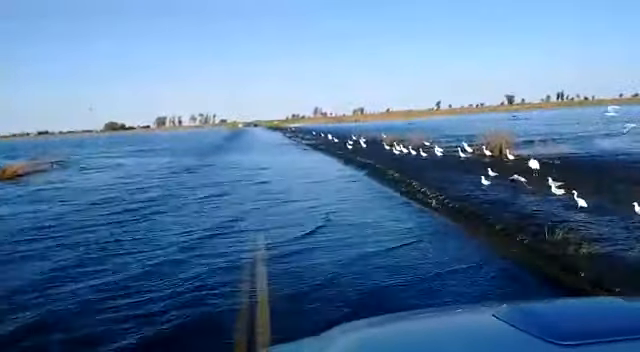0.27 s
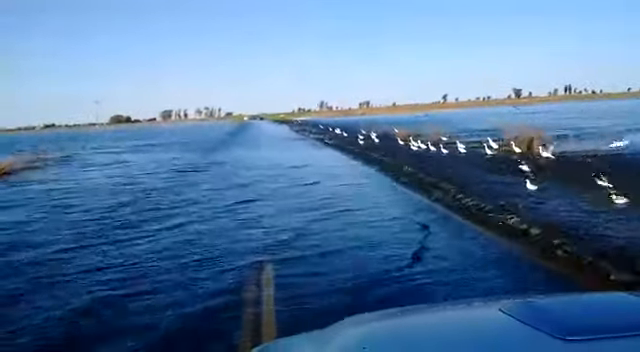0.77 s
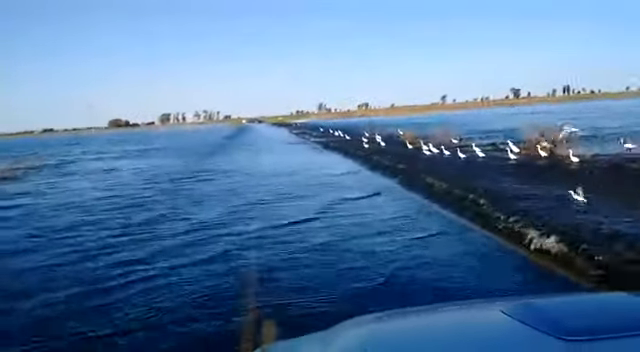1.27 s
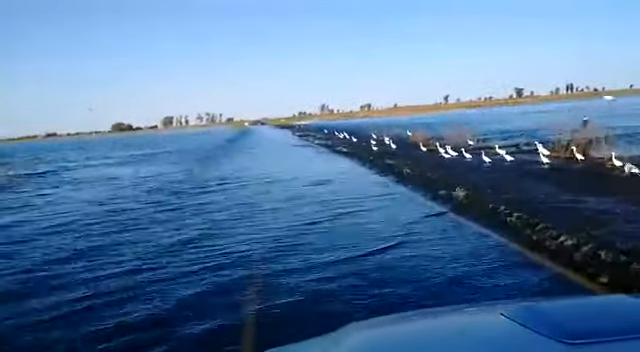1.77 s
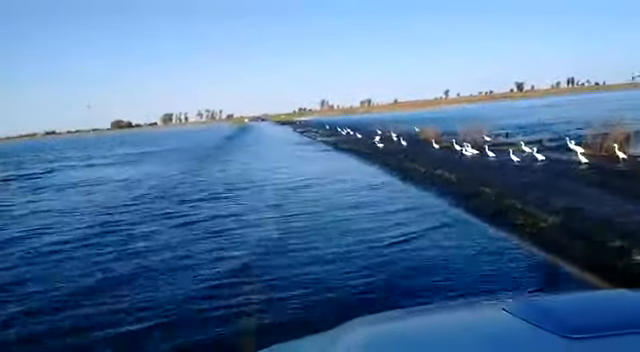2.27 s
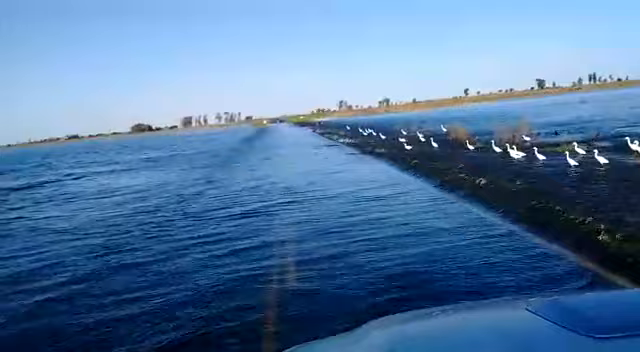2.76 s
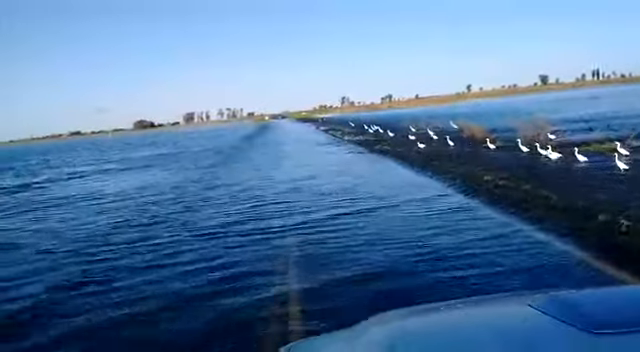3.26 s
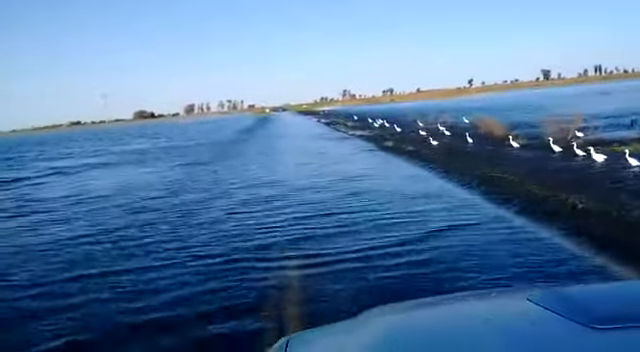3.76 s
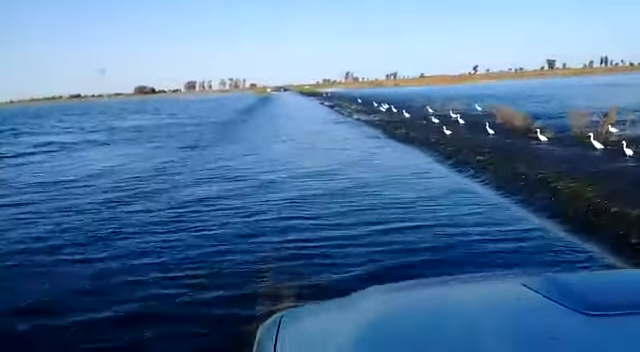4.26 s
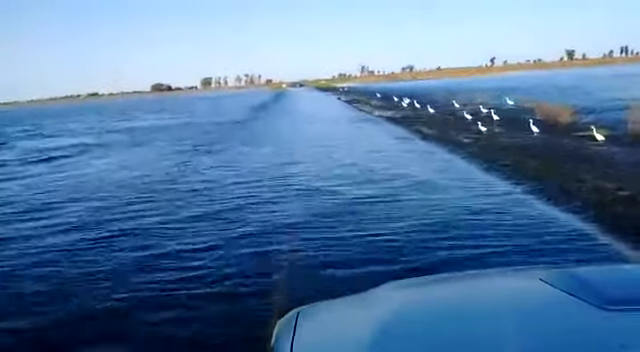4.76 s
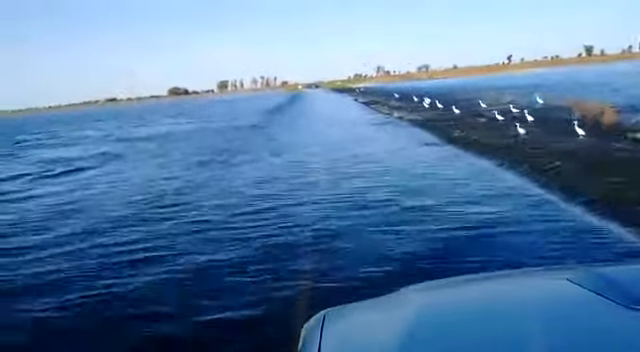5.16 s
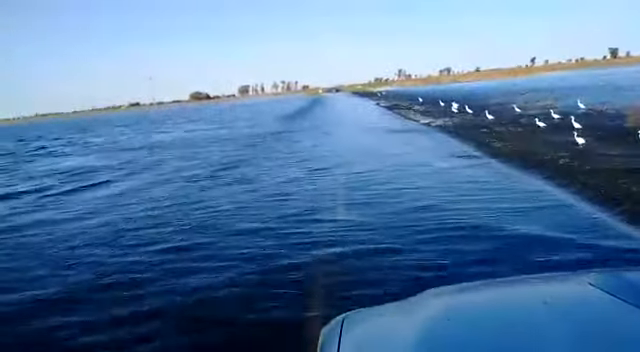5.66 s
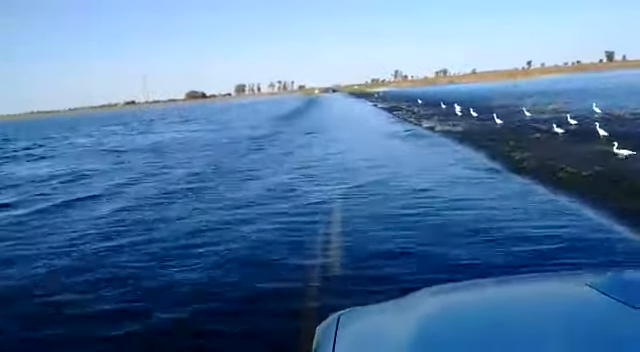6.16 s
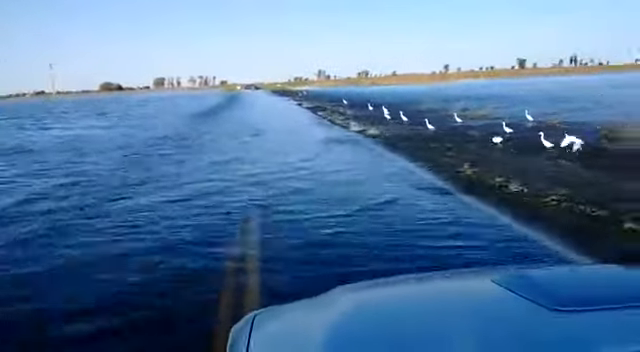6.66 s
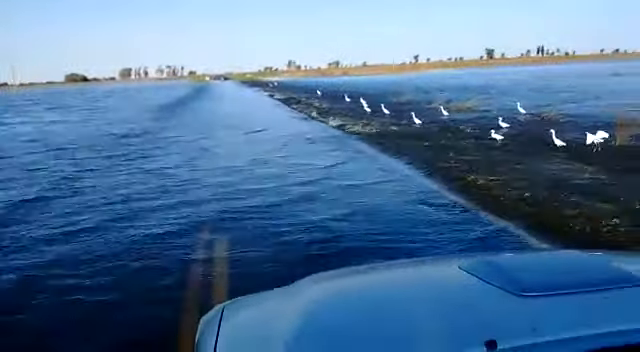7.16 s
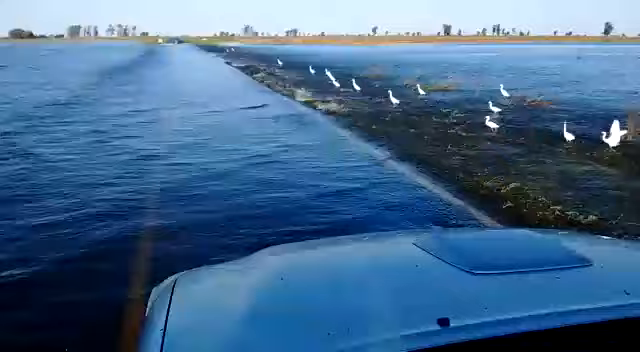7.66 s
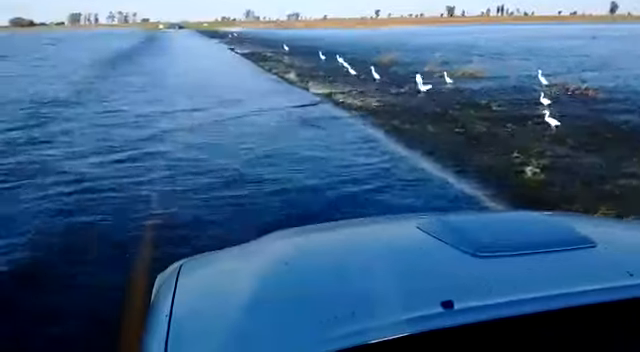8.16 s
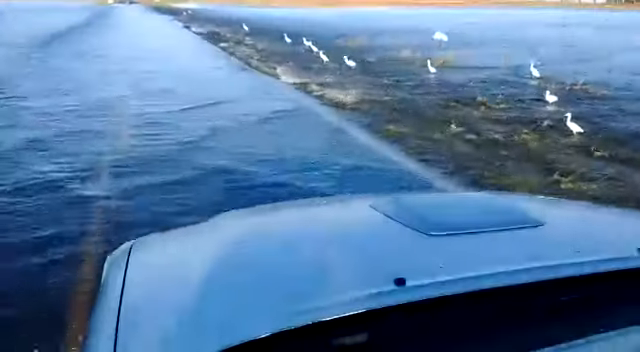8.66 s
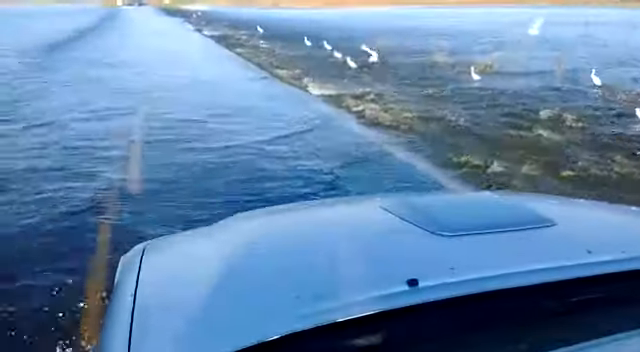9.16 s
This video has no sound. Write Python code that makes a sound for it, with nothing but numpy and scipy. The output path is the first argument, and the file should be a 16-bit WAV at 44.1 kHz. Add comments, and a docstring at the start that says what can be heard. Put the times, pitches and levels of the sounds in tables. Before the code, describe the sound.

Steady tyre wash on a flooded open road: patchy wet hiss, ringing droplets and gurgling bubbles, surging gently. Over it, wind roars low and a breathy, unsteady hum sags and barks as air crosses the unprotected handheld microphone. Sudden buffets thud and distort near three, four and five seconds, with another near eight and a half. The splash dips in the middle, then swells again. No echo, dull extreme treble.

```python
"""A flooded road, heard from a phone held out of the side window of a rolling vehicle.
The tyres throw an unbroken wash and spray: patchy hiss mixed with ringing drops, and big bubbles gurgle.
The airstream rumbles as shaped noise and blows a hollow, wavering hum, a noisy narrow resonance.
Buffets and hard slaps of wind set the microphone ports ringing in short bursts.
Loud bursts make the gain control duck and creep back; the highest peaks clip."""
import sys
import numpy as np
from scipy import signal
from scipy.fft import rfft, irfft, next_fast_len
from scipy.io import wavfile

SR = 44100
rng = np.random.default_rng(int(sys.argv[2]) if len(sys.argv) > 2 else 0)


def bounce(signal):
    """Save signal as a 16-bit WAV file at the path given by the first command-line argument."""
    frames = np.transpose(np.atleast_2d(signal))
    limited = np.clip(frames, -1, 1)
    pcm = np.round(limited * 32767).astype(np.int16)
    wavfile.write(sys.argv[1], SR, pcm)


N = 415863
TIME = np.arange(N) / SR


def from_db(db):
    """Decibels to gain."""
    return 10 ** (np.asarray(db) / 20)


def rms_one(x):
    """Scale to an rms of 1."""
    return x / np.sqrt(np.mean(x ** 2) + 1e-20)


def in_time(rows):
    """Draw each column of a timed curve at every sample."""
    s, *columns = np.transpose(rows)
    return [np.interp(TIME, s, c) for c in columns]


def at_hz(points, hz):
    """Read a table on a log-frequency axis."""
    f, value = np.transpose(points)
    return np.interp(np.log(hz), np.log(f), value)


def filtered(x, response):
    """Pass x through a smooth response, given as a function of Hz."""
    size = next_fast_len(N, real=True)
    hz = np.maximum(np.arange(size // 2 + 1) * SR / size, 1)
    return irfft(rfft(x, size) * response(hz), size)[..., :N]


def coloured(x, spectrum):
    """Give white sound a spectrum; rms 1."""
    return rms_one(filtered(x, lambda hz: from_db(at_hz(spectrum, hz))))


def drift(rate):
    """Slow random wander with an rms of 1; a higher rate moves faster."""
    # made at a twentieth of the sample rate, after a run-in
    r = np.exp(-40 * np.pi * rate / SR)
    noise = rng.standard_normal(N // 20 + 4002)
    slow = signal.lfilter([1], [1, -2 * r, r * r], noise)[4000:]
    return np.interp(np.arange(N) / 20, np.arange(len(slow)), rms_one(slow))


def soften_above(x, hz):
    """Roll off the treble gently."""
    return signal.sosfilt(signal.butter(2, hz, fs=SR, output="sos"), x)


def drops(per_s, spread_db, cycles, low_hz, high_hz, count):
    """Unequal random clicks ring a bank of pitches, falling 60 dB in the given cycles; rms 1."""
    out = np.zeros(N)
    for hz in np.geomspace(low_hz, min(high_hz, .4 * SR), count):
        at = rng.integers(0, N, int(per_s * N / SR / count))
        size_db = spread_db * np.minimum(rng.exponential(1, len(at)), 5)
        clicks = np.full(N, 1e-18)
        clicks[at] = from_db(size_db) * rng.choice([-1, 1], len(at))
        r, w = from_db(-60 * hz / (cycles * SR)), 2 * np.pi * hz / SR
        ringing = signal.lfilter([1, 0, -1], [1, -2 * r * np.cos(w), r * r], clicks)
        # wider bands at higher pitch: keep the spectrum even
        out += np.sqrt(hz) * rms_one(ringing)
    return rms_one(out)


def sheets(patchy_db, patchy_rate, count=7):
    """Three unrelated hisses whose bands swell together as sheets of water break up; rms 1."""
    out, white = 0, rng.standard_normal((2, 3, N))
    edges = 250 * 2 ** np.linspace(0, 6.1, count + 1)
    for k in range(count):
        band = signal.butter(2, edges[k:k + 2], "band", fs=SR, output="sos")
        # neighbouring bands take different noise
        out = out + signal.sosfilt(band, white[k % 2]) * from_db(patchy_db * drift(patchy_rate))
    return rms_one(out)


# how much louder the water is at the left port: (pitch_hz, left_minus_right_db)
PORT_BALANCE = [(500, 23), (1170, 0), (1780, 4), (2720, 7.4), (4160, 2), (6350, 3), (9700, 0.4), (11000, 4),
                (12200, 20), (15000, 22)]
# share of the water's power common to both ports: (pitch_hz, likeness_0_to_1)
PORT_LIKENESS = [(500, 1), (1400, 0.79), (2200, 0.21), (3200, 0.52), (4700, 0.79), (6500, 0.83),
                 (8000, 0.14), (9400, 1), (11000, 0.69), (15000, 0.65)]
# how far the common sound leads at the left port: (pitch_hz, lead_radians)
PORT_PHASE = [(500, 5.6), (1300, 0.55), (2300, 0.57), (3000, 2.9), (3900, 5.8), (4900, 6.33), (6400, 9.17),
              (7100, 7.9), (8100, 5.8), (9350, 9.77), (10400, 12.7), (15000, 22.6)]


def at_ports(direct, diffuse):
    """Direct sound bends round the phone to the right port; scattered sound differs in each."""
    def alike(hz):
        return np.clip(at_hz(PORT_LIKENESS, hz), 0, 1)

    def pan(hz):
        balance_db = at_hz(PORT_BALANCE, hz)
        sides = from_db(balance_db * np.array([[.5], [-.5]]))
        return sides / np.sqrt(np.cosh(balance_db * np.log(10) / 20))  # same total power

    def turn(hz):
        return np.exp(1j * at_hz(PORT_PHASE, hz) * np.array([[0], [-1]]))

    common = filtered(direct, lambda hz: pan(hz) * turn(hz) * np.sqrt(alike(hz)))
    return common + filtered(diffuse, lambda hz: pan(hz) * np.sqrt(1 - alike(hz)))


GURGLE_DB = -16.5  # relative to the thrown water


def gurgle(lumps_db, lumps_rate):
    """Big bubbles in the bow wave glug in clumps on either side."""
    glugs = np.array([drops(per_s=500, spread_db=2.5, cycles=10.0, low_hz=470, high_hz=1160, count=8)
                      for port in range(2)])
    return rms_one(glugs * from_db(lumps_db * drift(lumps_rate))) * from_db(GURGLE_DB)


# tone of the wash under the tyres: (pitch_hz, density_db_per_hz)
WASH_SPECTRUM = [(300, 7), (600, -32), (900, -6), (1300, -2.5), (2000, 1), (2500, 0), (3100, -7),
                 (4500, -16.5)]
# tone of the fine spray: (pitch_hz, density_db_per_hz)
SPRAY_SPECTRUM = [(2200, -23), (3100, -2.5), (4200, 1.5), (5200, -2.5), (6400, -6), (8000, -4.5),
                  (10200, -7), (11800, -11), (15500, -39)]
# how much water the tyres throw, with the depth of the flood: (time_s, level_db)
FLOOD_LEVEL = [(0, -31.5), (0.35, -30), (0.62, -34.5), (0.88, -31.5), (1.11, -32), (1.45, -30),
               (1.6, -32.5), (1.85, -31.5), (1.98, -36.5), (2.2, -33.5), (2.4, -36.5), (2.62, -31),
               (2.75, -35.5), (3.6, -36.5), (4.0, -32.5), (4.2, -36.5), (4.45, -34), (5.1, -33), (5.7, -37),
               (6.1, -34.5), (6.28, -33.5), (6.55, -31.5), (7.0, -30), (7.65, -29), (7.82, -33.5),
               (8.3, -29.5), (8.7, -31.5), (9.43, -31)]
WASH_DB, SPRAY_DB = -4.5, -5.5  # relative to the thrown water
RIPPLE_DB, RIPPLE_RATE = 0.85, 3.7  # ripples on the road make the water surge at random


def water():
    """A bubbling wash under the tyres and fine spray pattering back, surging together, over a gurgle."""
    thrown_db, = in_time(FLOOD_LEVEL)
    # slow surge plus a quicker flicker
    surge_db = RIPPLE_DB * drift(RIPPLE_RATE) + 0.79 * drift(32)
    wash = sheets(patchy_db=1.03, patchy_rate=16)
    spray = sheets(patchy_db=2.0, patchy_rate=12.5)
    # bubbles and droplets join the direct sound only
    bubbles = drops(per_s=1500, spread_db=1.5, cycles=20.6, low_hz=638, high_hz=3013, count=16)
    droplets = drops(per_s=3100, spread_db=4.0, cycles=15.0, low_hz=2960, high_hz=14000, count=14)
    wash[0] = 0.97 * wash[0] + 0.58 * bubbles
    spray[0] = 0.66 * spray[0] + 0.36 * droplets
    both = coloured(wash, WASH_SPECTRUM) * from_db(WASH_DB)
    both = both + coloured(spray, SPRAY_SPECTRUM) * from_db(SPRAY_DB)
    both = both * from_db(thrown_db + surge_db)
    return at_ports(both[0], both[1:]) + gurgle(lumps_db=4.5, lumps_rate=9.3) * from_db(thrown_db)


# tone of the wind rumble: (pitch_hz, density_db_per_hz)
RUMBLE_SPECTRUM = [(15, -3), (30, -9), (60, 2.5), (125, 4.5), (170, 2), (240, -2), (350, -9), (450, -15),
                   (600, -19), (800, -25), (1100, -30.5), (1700, -56)]
# base level of the rumble, before gusts: (time_s, level_db)
RUMBLE_CURVE = [(0, -18), (2.2, -19), (2.75, -16), (3.1, -19.5), (3.7, -16.5), (4.4, -19.5), (5.2, -16.5),
                (5.8, -23), (7.2, -17), (8.1, -18.5), (8.7, -19), (9.43, -19)]


def rumble(gust):
    """Turbulent air on the ports: three unrelated low noises, swelling with the gusts."""
    rumble_db, = in_time(RUMBLE_CURVE)
    return coloured(rng.standard_normal((3, N)), RUMBLE_SPECTRUM) * from_db(rumble_db + 2.1 * gust)


FLUTTER_DB = -27  # relative to the rumble's base level


def flutter(gust):
    """The smallest gusts tick and flutter in each port as short, softened rings."""
    rumble_db, = in_time(RUMBLE_CURVE)
    ticks = np.array([drops(per_s=150, spread_db=3.5, cycles=9.5, low_hz=480, high_hz=936, count=5)
                      for port in range(2)])
    return soften_above(ticks, 1400) * from_db(rumble_db + FLUTTER_DB + 1.5 * gust)


# strong eddies that drag the hum down and make it bark: (time_s, strength_0_to_1)
HUM_DRAGS = [(0.02, 0.7), (0.172, 0.57), (0.66, 0.51), (0.872, 0.73), (0.997, 0.96), (1.085, 0.93),
             (1.354, 0.63), (2.666, 0.75), (2.701, 0.78), (3.666, .7), (3.753, .9), (3.854, 0.93),
             (3.915, 0.65), (4.62, 0.62), (6.52, 0.6), (6.82, 0.63), (6.875, 0.75), (7.072, 0.95),
             (7.127, .9), (7.30, 0.71), (8.35, 0.44), (8.877, 0.78), (9.10, 0.67), (9.316, 0.94),
             (9.378, 0.97)]


def drag(per_s, weak, width_s, size=4001):
    """Pull of passing eddies on the hum: strong ones among random weak ones, each a brief swell."""
    passes = (rng.random(N) < per_s / SR) * weak * rng.random(N)
    for s, strength in HUM_DRAGS:
        passes[round(s * SR)] = strength
    t = (np.arange(size) - size // 2) / SR
    swell = np.exp(-.5 * (t / width_s) ** 2)
    pull = np.minimum(signal.fftconvolve(passes, swell, "same"), 1)
    return pull - pull.mean()


def port_hum(pitch_hz, width_hz, waver, steady):
    """The airstream blows a narrow air resonance: its pitch wavers and eddies roughen it; rms 1."""
    wavering_hz = pitch_hz * (1 + waver * (1 - np.abs(1.3 * drift(8.97))))
    phase = 2 * np.pi * np.cumsum(wavering_hz) / SR
    swing = steady + drift(width_hz) + 1j * drift(width_hz)
    # losses grow with the swing, which evens out its loudest moments
    swing = swing / (1 + np.abs(swing) ** 2) ** 0.09
    return rms_one(np.real(swing * np.exp(1j * phase)))


# centre line of the hum, before waver and drag: (time_s, pitch_hz)
HUM_CURVE = [(0.0, 326), (0.08, 364), (0.15, 313), (0.31, 371), (0.39, 345), (0.52, 360), (0.76, 315),
             (1.26, 337), (1.37, 316), (1.52, 349), (1.6, 328), (1.95, 378), (2.05, 355), (2.24, 382),
             (2.36, 354), (2.44, 380), (2.68, 369), (2.76, 336), (2.86, 331), (2.94, 372), (2.99, 344),
             (3.07, 377), (3.18, 332), (3.23, 365), (3.47, 338), (3.6, 380), (3.67, 340), (3.81, 359),
             (3.86, 333), (3.96, 334), (4.04, 305), (4.18, 339), (4.33, 323), (4.57, 350), (4.62, 330),
             (4.91, 347), (5.2, 317), (5.3, 382), (5.38, 379), (5.46, 340), (5.49, 360), (5.65, 298),
             (5.7, 326), (6.14, 348), (6.22, 325), (6.96, 320), (7.12, 307), (7.44, 360), (7.5, 329),
             (7.75, 348), (8.06, 346), (8.09, 318), (8.19, 343), (8.36, 283.6), (8.46, 328.4),
             (8.54, 281.5), (8.77, 328), (8.85, 295.5), (9.03, 281.2), (9.11, 320), (9.22, 275),
             (9.38, 307), (9.43, 332)]
# strength of the airstream at the phone: (time_s, level_db)
AIR_CURVE = [(0, -14.5), (0.35, -18.5), (0.55, -15), (1.05, -16), (1.38, -12), (1.62, -15.5), (1.98, -17),
             (2.2, -15), (2.68, -12), (2.78, -13), (3.03, -18), (3.45, -15), (3.75, -15), (4.1, -18),
             (4.5, -16), (5.1, -15), (5.28, -16.5), (5.8, -20.5), (6.25, -20), (6.75, -15), (7.1, -17.5),
             (7.45, -16), (7.85, -19.5), (8.3, -19.5), (8.55, -20), (8.77, -17), (8.98, -23.5),
             (9.11, -18.5), (9.23, -24), (9.33, -16.5), (9.43, -18)]
HUM_DB = -2.0  # relative to the airstream
HUM_SWELL_DB, HUM_SWELL_RATE = -0.47, 17  # the hum swells and fades at random
DRAG_SAG, DRAG_SWELL_DB = .16, 9.5  # share of pitch lost and level gained per unit of pull
ROAR_DB, ROAR_RATIO = -11, 0.78  # level relative to the airstream, share of the hum's centre pitch


def hum(gust):
    """The ports hum in the airstream, sagging and barking under drag; a breathy roar rides just below."""
    pitch_hz, = in_time(HUM_CURVE)
    air_db, = in_time(AIR_CURVE)
    pull = drag(per_s=26, weak=0.43, width_s=0.00691)
    hum_db = air_db + HUM_DB + HUM_SWELL_DB * drift(HUM_SWELL_RATE) + 0.7 * gust + DRAG_SWELL_DB * pull
    dragged_hz = pitch_hz * (1.015 - DRAG_SAG * pull)
    tone = port_hum(dragged_hz, width_hz=33.8, waver=0.01998, steady=1.43) * from_db(hum_db)
    roar = port_hum(ROAR_RATIO * pitch_hz, width_hz=43, waver=0.0612, steady=0)
    return tone + roar * from_db(air_db + ROAR_DB + 1.0 * gust)


# buffets of wind: (start_s, length_s, thump_db, crackle_db)
WIND_BUFFETS = [(0.383, 0.012, -13, -30), (2.839, 0.024, -6, -20), (3.318, 0.0099, -26, -27),
                (3.414, 0.01, -22, -32), (3.625, 0.014, -21, -31), (3.753, 0.0053, -15, -26.5),
                (4.073, 0.044, -8.5, -25), (4.351, 0.0086, -12, -19), (4.483, 0.012, -13, -33.5),
                (4.745, 0.017, -8, -18.5), (5.193, 0.0093, -1.5, -21), (5.204, 0.009, -16, -18),
                (5.62, 0.0291, -6, -26), (6.79, 0.02, -24, -33), (8.062, 0.034, -22, -30),
                (8.437, 0.012, -9.5, -26), (8.453, 0.015, -6.5, -16), (8.982, 0.019, -21, -34),
                (9.366, 0.046, -19, -35)]
BUILD_DB_PER_S = 100  # the eddies grow in the course of a buffet
WAKE_DB_PER_S = 2200  # extra fall once its length is over


def buffet_rings(modes, levels_db, soft_hz, gap_s, size=8192):
    """Eddies slam into the port in quick, uneven succession, ever harder, then die away."""
    out = np.zeros(N + 2 * size)
    # each slam has its own gap, strength and sign
    chance = rng.random((len(WIND_BUFFETS), 2, 16))
    for (s, length, *_), level_db, (gaps, strengths) in zip(WIND_BUFFETS, levels_db, chance):
        at = np.r_[0, np.cumsum(gap_s * (.5 + gaps[1:]))]
        build_db = BUILD_DB_PER_S * np.minimum(at, length)
        force = from_db(build_db - WAKE_DB_PER_S * np.maximum(at - length, 0))
        slams = np.zeros(size)
        slams[(at * SR).astype(int)] = force * (.5 + strengths) * np.sign(.5 - gaps)
        rings = 0
        for k, (hz, width_hz, db) in enumerate(modes):
            r = np.exp(-np.pi * width_hz / SR)
            top = (1 - r * r) / 2 * from_db(db) * (-1) ** k  # neighbours ring in opposite sign
            bottom = [1, -2 * r * np.cos(2 * np.pi * hz / SR), r * r]
            rings = rings + signal.lfilter([top, 0, -top], bottom, slams)
        burst = rms_one(soften_above(rings, soft_hz)) * np.sqrt(length * SR / size)  # energy goes with length
        start = round(s * SR)
        out[start:start + size] += from_db(level_db) * burst
    return out[:N]


# low port resonances that a buffet rings: (pitch_hz, width_hz, relative_db)
THUMP_MODES = [(118, 180, -3.5), (280, 185, -1.5)]
# high port resonances that a buffet rings: (pitch_hz, width_hz, relative_db)
CRACKLE_MODES = [(550, 132, 4.5), (787, 273, 3.5), (960, 334, 0.5), (1380, 1300, -26), (2060, 260, -56)]


def buffets():
    """Each buffet rings the port twice over: a low thump and a higher crackle."""
    _, _, thump_db, crackle_db = np.transpose(WIND_BUFFETS)
    thump = buffet_rings(THUMP_MODES, thump_db, soft_hz=520, gap_s=0.0035)
    return thump + buffet_rings(CRACKLE_MODES, crackle_db, soft_hz=2330, gap_s=0.004)


# single hard eddies that slap the port: (start_s, level_db, pitch_hz, decay_cycles)
PORT_SLAPS = [(0.3842, -7, 940, 1.0), (0.3905, -16, 600, 1.2), (1.4455, -16, 704, 1.2),
              (1.464, -16, 597, 1.4), (2.687, -13, 520, 1.5), (2.84, -2, 790, 0.86), (2.8462, 4, 580, 1.2),
              (2.853, 2, 865, 0.6), (2.857, -6, 900, 1), (2.976, -12, 640, 1.4), (3.105, -16, 850, 1.3),
              (3.321, -14, 637, 1.5), (3.4222, -15, 1050, 1.7), (3.6247, -17, 1090, 1.3),
              (3.7543, 2, 580, 0.73), (3.852, -6, 340, 1.8), (3.9894, -16, 736, 1.2),
              (4.0932, -9, 1000, 1.1), (4.1012, -4.5, 615, 0.9), (4.1107, 0, 800, 0.81),
              (4.116, -5, 200, 0.67), (4.3495, -19.5, 864, 1), (4.359, -5.5, 915, 1.1),
              (4.384, -18, 790, 1.2), (4.4835, -15, 704, 1.9), (4.619, -4, 380, 2.0),
              (4.7456, -8, 780, 1.5), (4.7517, -4, 530, 1.3), (4.7612, -5.5, 760, 1.4),
              (5.0286, -13.5, 850, 1.5), (5.1931, 11, 560, 0.41), (5.1978, 4, 805, 1.25),
              (5.6435, -5, 850, 1.0), (5.9854, -18.5, 700, 1.5), (6.695, -11, 636, 1.2),
              (8.4372, -13, 750, 1.2), (8.4515, -1.5, 652, 2.4), (8.4571, 7, 537, 0.99),
              (8.467, -6, 750, 1.0), (8.625, -22.5, 650, 1.4), (8.79, -20, 623, 1.4),
              (8.868, -18, 640, 1.4), (8.95, -18, 650, 1.7), (9.137, -13, 680, 1.5)]


def slaps(soft_hz, rise_cycles, size=2048):
    """One hard eddy sets the port ringing for a cycle or two, at a pitch of its own."""
    out, t = np.zeros(N + size), np.arange(size) / SR
    for s, db, hz, cycles in PORT_SLAPS:
        start = round(s * SR)
        rise = 1 - np.exp(-hz * t / rise_cycles)
        decay = np.exp(-hz * t / max(cycles, .5))  # at least half a cycle
        out[start:start + size] += from_db(db) * rise * decay * np.sin(2 * np.pi * hz * t)
    return soften_above(out[:N] + 1e-18, soft_hz)


PORT_LAG_S = 0.00027  # the shared wind reaches the left port this much later


def wind():
    """Air pushes on one port as it pulls on the other; each port also has small eddies of its own."""
    gust = drift(14.5)
    eddies = rumble(gust)
    blown = hum(gust) + buffets() + slaps(soft_hz=2030, rise_cycles=0.091)
    left = eddies[0] * from_db(-0.55) + blown * from_db(-0.5)
    right = eddies[0] * from_db(0.04) + blown * from_db(2.5)
    shared = np.array([np.interp(TIME - PORT_LAG_S, TIME, left), -right])
    return shared + from_db(-12.0) * eddies[1:] + flutter(gust)


def scene():
    """Water below, wind on the phone."""
    return water() + wind()


def gain_control(x, threshold_db, release_db_per_s, window_s, attack_s):
    """A loud burst above the bass quickly pulls the gain down; it recovers at a steady rate."""
    sensed = signal.sosfilt(signal.butter(4, 520, "high", fs=SR, output="sos"), x)
    keep = np.exp(-1 / (window_s * SR))
    power = signal.lfilter([1 - keep], [1, -keep], np.mean(sensed ** 2, axis=0))
    over_db = np.maximum(10 * np.log10(np.maximum(power, 1e-12)) - threshold_db, 0)
    # hold each peak and let it fall along a straight line in dB
    recovery_db = release_db_per_s * TIME
    held_db = np.maximum.accumulate(over_db + recovery_db) - recovery_db
    r = np.exp(-1 / (attack_s * SR))
    return x * from_db(-signal.lfilter([1 - r], [1, -r], held_db))


CUTOFF_HZ = 15500


def record(dry):
    """Gain control, hard overload, then a steep cut of the top."""
    ducked = gain_control(dry, threshold_db=-18.5, release_db_per_s=10.0, window_s=0.016, attack_s=0.0025)
    top_cut = signal.ellip(12, .1, 80, CUTOFF_HZ, fs=SR, output="sos")
    return signal.sosfilt(top_cut, np.clip(ducked, -1, 1))


dry = scene()
out = record(dry)
bounce(out)
```